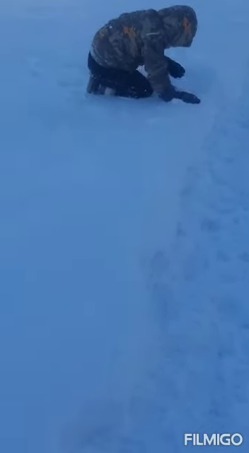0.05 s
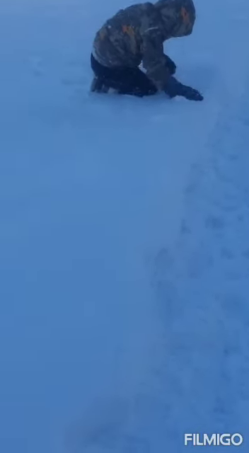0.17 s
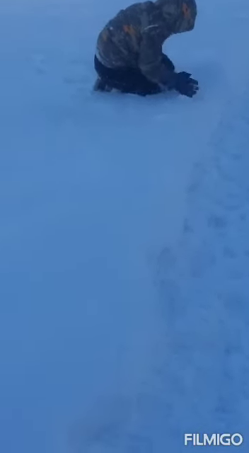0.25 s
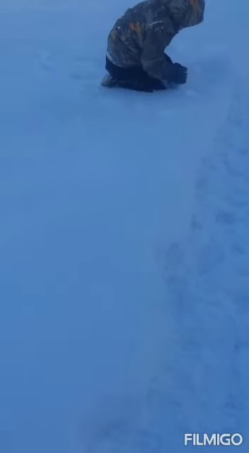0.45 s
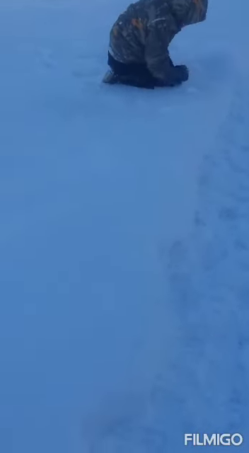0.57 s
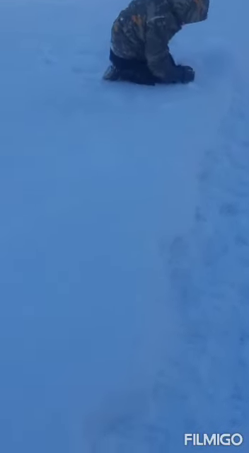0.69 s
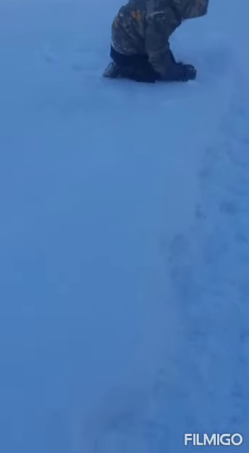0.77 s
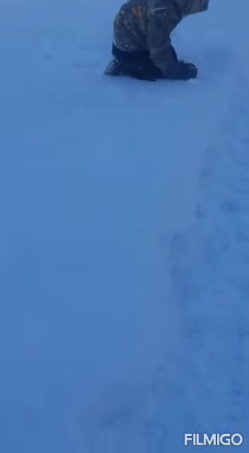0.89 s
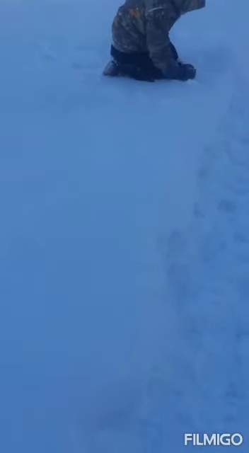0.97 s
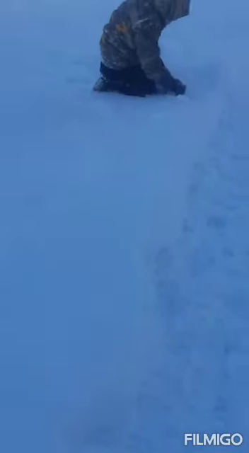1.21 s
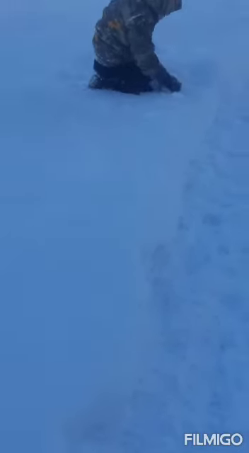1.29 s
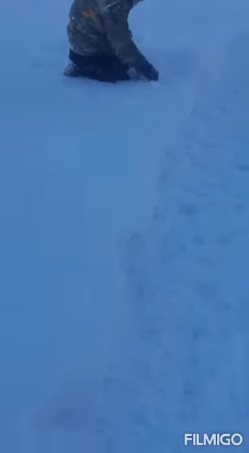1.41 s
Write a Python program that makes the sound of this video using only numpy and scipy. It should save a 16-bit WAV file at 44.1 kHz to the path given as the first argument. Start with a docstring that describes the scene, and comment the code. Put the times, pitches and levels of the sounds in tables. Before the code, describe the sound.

Snow hisses, crunches and faintly creaks as gloves pack it twice, outdoors and a little way off. Low gusts buffet the microphone, mostly on the right, over a soft distant roar, before one small tick on the left.

```python
"""An open snowy slope, with a two-port microphone some metres from gloved hands at work.
The hands sweep snow together and press it: two strokes hiss with fine grains, the crust crunches
and the packed snow creaks. Wind buffets the microphone, mostly its right port, over a soft distant
roar and a thin hiss. Near the end one sharp little tick lands close to the left port."""
import sys
import numpy as np
from scipy import signal
from scipy.fft import rfft, irfft
from scipy.io import wavfile
from scipy.ndimage import uniform_filter1d

SR = 44100
rng = np.random.default_rng(int(sys.argv[2]) if len(sys.argv) > 2 else 0)


def dump(signal):
    """Clip the signal to [-1, 1] and save it as 16-bit WAV at the path in sys.argv[1]."""
    limited = np.clip(np.atleast_2d(signal).T, -1, 1)
    pcm = np.round(limited * 32767).astype(np.int16)
    wavfile.write(sys.argv[1], SR, pcm)


N = 63945
T, HZ = np.arange(N) / SR, np.fft.rfftfreq(N, 1 / SR)

# Far roar, thin hiss and gusts over time. Each row: time in seconds, relative level in dB.
ROAR_LEVEL = [(0, -62.5), (.25, -62.5), (.5, -63), (.8, -65), (.92, -65.5), (1.1, -63.5), (1.45, -64)]
HISS_LEVEL = [(0, -71.5), (.9, -71.5), (1.02, -69.5), (1.22, -71), (1.45, -70)]
GUST_LEVEL = [(0.0, -75), (0.096, -74), (0.116, -57), (0.294, -45.5), (0.35, -57.5), (0.416, -42),
              (0.48, -36.5), (0.512, -44.5), (0.706, -59.5), (0.794, -51.5), (0.904, -60.5), (0.98, -45.5),
              (1.054, -48), (1.154, -45.5), (1.17, -48), (1.348, -58), (1.384, -54.5), (1.45, -78)]
# The tone of each source. Each row: frequency in Hz, relative level in dB.
ROAR_SPECTRUM = [(30, 4), (120, -9.5), (220, -10.5), (400, 2.5), (600, 4.5), (820, 0.5), (1050, -6),
                 (1350, -17), (2000, -23), (3500, -51), (8000, -59)]
HISS_SPECTRUM = [(500, 0), (2000, -0.5), (2600, 1.5), (3400, -5), (4000, -3.5), (4500, -3), (5500, 3.5),
                 (6800, -2.5), (8000, -9), (9300, -12), (10500, -8), (12500, -1.5), (16000, -7)]
BUFFET_SPECTRUM = [(15, -28), (30, -6.5), (50, 10.5), (75, 3.5), (120, -3.5), (170, -15.5), (260, -18.5),
                   (400, -27), (900, -53.5)]
EDDY_SPECTRUM = [(40, -31), (120, 0), (200, -2), (290, -6), (400, -12.5), (800, -35), (2000, -60)]
SWEEP_SPECTRUM = [(700, 8.5), (1200, 1), (1400, -4.5), (1980, -8), (2230, -3), (3110, -1.5), (3870, 1),
                  (7570, -2.5), (8440, -7.5), (9210, -18.5), (10000, -7), (12200, -4), (16000, -8)]
CRUNCH_SPECTRUM = [(500, -11), (1000, -9), (1300, -10), (1550, 7), (1900, -16.5), (2300, 3), (2800, -11.5),
                   (3900, -1.5), (4800, -8.5), (7000, -8.5), (9000, 1), (12000, 9), (16000, -6)]
TICK_SPECTRUM = [(2000, -32), (4000, -20), (5500, -9), (9000, -9), (11500, -2), (14800, 0), (16000, -3)]
# Glove movements that make up the strokes. Each row: start, rise, hold and release in seconds,
# level in dB, slope in dB per second.
SWEEPS = [(0.043, .02, 0.068, 0.023, -71.5, 8), (0.119, 0.074, 0.23, 0.061, -57.5, -19),
          (0.455, 0.041, 0.071, 0.017, -65.5, -25), (0.56, 0.039, 0.11, 0.11, -62.5, -17)]
# Packed snow creaking. Each row: start, rise, hold and release in seconds, level in dB,
# resonance and its width in Hz.
SQUEEZES = [(0.089, 0.11, 0.062, 0.011, -63, 558, 200), (0.308, 0.011, 0.121, 0.021, -71.5, 2290, 390),
            (0.571, 0.041, 0.046, 0.018, -68.5, 1510, 187.3), (0.582, 0.018, 0.079, 0.014, -66, 967, 171)]
# Snow giving way. Each row: peak time in seconds, level in dB, decay in seconds, centre in Hz.
CRUNCHES = [(0.18, -62, 0.0047, 3480), (0.31, -52.5, 0.0028, 3980), (0.3257, -48.5, 0.0014, 3300),
            (.3335, -52.5, 0.002, 3200), (.340, -56, 0.0032, 3000), (0.353, -59, 0.0075, 3170),
            (0.397, -63, 0.013, 3000), (0.4179, -53.5, 0.0029, 2310), (0.432, -63, 0.0034, 2500),
            (.481, -76, 0.003, 7500), (0.5136, -59, 0.002, 5600), (0.597, -67, .004, 4000),
            (0.614, -59, 0.0018, 4470), (.672, -62, 0.012, 3750)]
# Puffs on the microphone. Each row: time in seconds, level in dB, swing rate in Hz, width in seconds,
# the swing's left over right in dB, eddies relative to the swing in dB.
PUFFS = [(.2, -47, 84, 0.0037, -18.5, -7.5), (0.275, -49.5, 109, 0.0059, -3, -7),
         (0.399, -37, 125, 0.0022, -9, -12.5), (.414, -31.5, 91.8, 0.0065, -4.5, -14.5),
         (.43, -36.5, 117, 0.0032, 8, -10), (.462, -43.5, 89, 0.0064, -17, 0.5),
         (0.508, -37, 93, 0.0026, -12.5, -14.5), (0.525, -45, 88, 0.0074, -28, -8),
         (.596, -45.5, 69, 0.0052, -9, -16), (.979, -40.5, 78, 0.0038, -11, -15.5),
         (1.012, -45.5, 68, 0.011, 3, -9.5), (1.094, -50.5, 140, 0.0022, -27.5, -9),
         (1.146, -31.5, 66, 0.0045, 4, -16), (1.195, -45.5, 105, 0.0022, -25.5, -11)]
# How the two ports differ in tone. Each row: frequency in Hz, left over right in dB.
PORT_BALANCE = [(1000, 0), (2500, 2), (4500, -0.5), (7000, -0.5), (8800, -14), (11000, 0.5), (15000, 4.5)]

WIND_LIKENESS, CRUST_LIKENESS = 0.1, 0.61  # correlation between the ports
EDDY_PAN_DB = -2


def amp(db):
    """Decibels to gain."""
    return 10 ** (np.asarray(db) / 20)


def pan(db):
    """Gains of the two ports, for left over right in dB."""
    return amp([[db / 2], [-db / 2]])


def level_db(points):
    """Level over time, straight between points."""
    return np.interp(T, *np.transpose(points))


def spectrum(points):
    """Gain per frequency, straight between points on a log axis."""
    hz, db = np.transpose(points)
    return amp(np.interp(np.log(HZ + 1), np.log(hz), db))


def colour(x, gain):
    """Filters by a gain per frequency, then scales to an rms of one."""
    filtered = irfft(rfft(x) * gain, N)
    return filtered / np.sqrt(np.mean(filtered ** 2) + 1e-20)


def pair(two, likeness):
    """Makes two unrelated signals partly alike."""
    return np.array([two[0], likeness * two[0] + np.sqrt(1 - likeness ** 2) * two[1]])


def noise(points, likeness):
    """Noise of a given spectrum at both ports."""
    return colour(pair(rng.standard_normal((2, N)), likeness), spectrum(points))


def grains(per_s, spread_db, likeness):
    """Random snaps of snow crystals at both ports, most small and a few large."""
    size = amp(spread_db * np.minimum(rng.exponential(1, (2, N)), 5))
    sign = rng.choice([-1, 1], (2, N))
    snapping = rng.random((2, N)) < per_s / SR
    return pair(size * sign * snapping, likeness)


def gesture(start, rise, hold, release):
    """Rise, hold and release of one hand movement."""
    return np.clip(np.minimum((T - start) / rise, 1 - (T - start - rise - hold) / release), 0, 1)


def burst(peak_s, rise_s, decay_s):
    """A quick rise to a peak, then an exponential fall."""
    return np.clip(1 + (T - peak_s) / rise_s, 0, 1) * np.exp(-np.maximum(T - peak_s, 0) / decay_s)


def from_the_left(two, delay_ms):
    """Sound from the left reaches the right port a little late."""
    lag = np.exp(-2j * np.pi * HZ * delay_ms / 1000)
    return np.array([two[0], irfft(rfft(two[1]) * lag, N)])


def open_air():
    """A soft roar far off that swells a little, and a thin hiss, both slightly left."""
    roar = amp(level_db(ROAR_LEVEL)) * noise(ROAR_SPECTRUM, likeness=0.65)
    hiss = amp(level_db(HISS_LEVEL)) * noise(HISS_SPECTRUM, likeness=0.1)
    return pan(4) * (roar + hiss)


def wind():
    """Gusts buffet the microphone, up to a limit; finer eddies grow faster in the strong ones."""
    gust_db = level_db(GUST_LEVEL)
    limit_db, strong_db, eddy_growth = -43, -51.5, 1.52
    buffet_db = np.minimum(gust_db, limit_db) - 8
    eddy_db = -74 + eddy_growth * (gust_db - strong_db)
    buffet = noise(BUFFET_SPECTRUM, WIND_LIKENESS)
    # Steadied over 23 ms, so that the gusts set its level.
    buffet /= np.sqrt(uniform_filter1d(buffet ** 2, int(0.023 * SR)) + 1e-6)
    eddies = noise(EDDY_SPECTRUM, WIND_LIKENESS)
    return amp(buffet_db) * pan(-21) * buffet + amp(eddy_db) * pan(EDDY_PAN_DB) * eddies


def sweeping():
    """Gloves slide through the snow some metres off: a dense hiss of fine grains under each stroke."""
    level = sum(gesture(start, rise, hold, release) * amp(db + slope * (T - start - rise))
                for start, rise, hold, release, db, slope in SWEEPS)
    fine = grains(per_s=9000, spread_db=2, likeness=0.46)
    low_cut = HZ ** 2 / (HZ ** 2 + 560 ** 2)
    return level * colour(fine, spectrum(SWEEP_SPECTRUM) * low_cut)


def squeezing():
    """Packed snow rubs against the gloves; each squeeze rings in one broad resonance."""
    slips = grains(per_s=3000, spread_db=2, likeness=CRUST_LIKENESS)
    out = 0
    for start, rise, hold, release, db, hz, width in SQUEEZES:
        resonance = 1 / (1 + 2j * (HZ - hz) / width) ** 2
        out += amp(db) * gesture(start, rise, hold, release) * colour(slips, resonance)
    return out


def crunching():
    """The crust gives way in short clumps of coarser grains, each with its own centre of pitch."""
    snaps = grains(per_s=6200, spread_db=0.9, likeness=CRUST_LIKENESS)
    rise_s, width_octaves = 0.0014, 0.48
    out = 0
    for peak_s, db, decay_s, hz in CRUNCHES:
        clump = burst(peak_s, rise_s, decay_s)
        band = 1 / (1 + (np.log2((HZ + 1) / hz) / width_octaves) ** 2)
        rms = amp(db) * np.sqrt(np.mean(clump ** 2))
        out += rms * colour(snaps * clump, spectrum(CRUNCH_SPECTRUM) * band)
    return out


def puffs():
    """Each puff swings the pressure at the ports back and forth once or twice and sheds a few eddies."""
    eddies = pan(EDDY_PAN_DB) * noise(EDDY_SPECTRUM, WIND_LIKENESS)
    out = 0
    for at, db, hz, width, side_db, eddy_db in PUFFS:
        widths_away = np.clip((T - at) / width, -20, 20)
        swing = np.sin(2 * np.pi * hz * (T - at)) / np.cosh(widths_away)
        shed = eddies / np.cosh(widths_away / 1.48)  # the eddies outlast the swing
        out += amp(db) * (pan(side_db) * swing + amp(eddy_db) * shed)
    return out


def tick():
    """A bright tick close to the left port, perhaps an ice grain, with a short fizz after it."""
    at = 1.2752
    snap = burst(at, rise_s=0.00045, decay_s=0.0009)
    fizz = amp(-14) * burst(at, rise_s=0.0009, decay_s=0.008)
    return amp(-53.5) * pan(8) * (snap + fizz) * noise(TICK_SPECTRUM, likeness=0.1)


def scene():
    """Hands in the snow a little to the left, a tick and wind at the microphone, open air behind."""
    hands = from_the_left(sweeping(), delay_ms=0.07)
    hands += from_the_left(crunching() + squeezing(), delay_ms=0.034)
    return hands + tick() + wind() + puffs() + open_air()


def record(dry):
    """The sound has a narrow treble dip near 9 kHz and ends at 16 kHz; the two ports differ in tone."""
    dip_hz, dip_width_hz, dip_db = 9050, 640, -8.5
    dip = amp(dip_db * np.exp(-((HZ - dip_hz) / dip_width_hz) ** 2))
    balance = spectrum(PORT_BALANCE) ** np.array([[0.5], [-0.5]])  # half to each port
    shaped = irfft(rfft(dry) * dip * balance, N)
    band_limit = signal.firwin(511, 16000, window=("kaiser", 9), fs=SR)
    return signal.oaconvolve(shaped, band_limit[None], "same")


dry = scene()
out = record(dry)
dump(out)
```